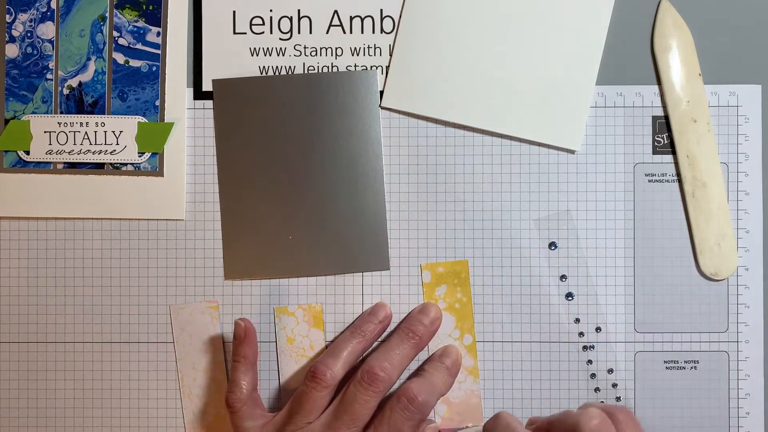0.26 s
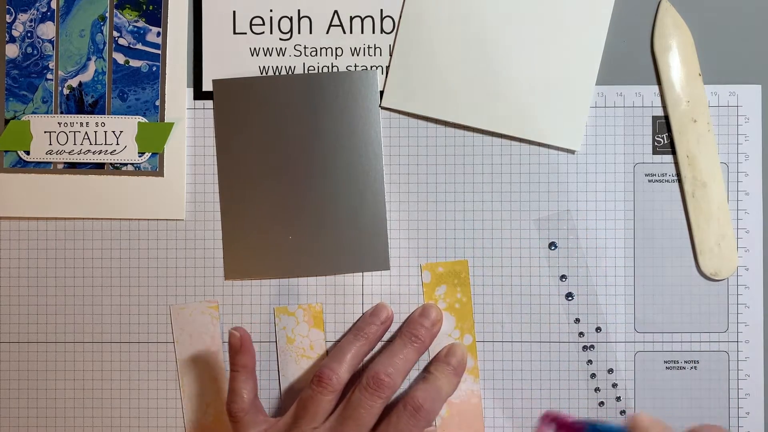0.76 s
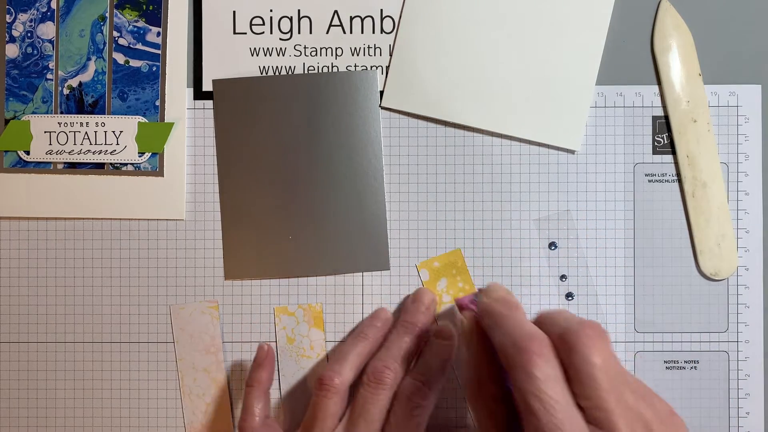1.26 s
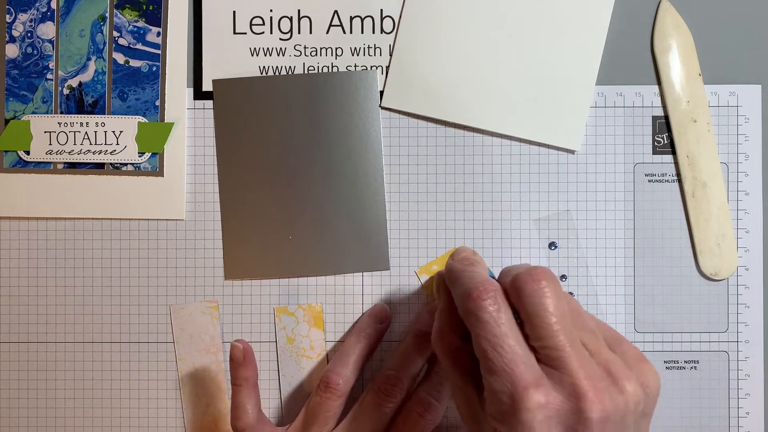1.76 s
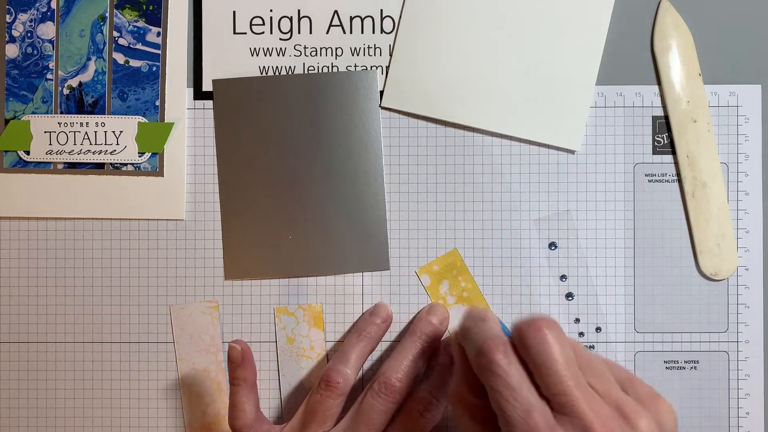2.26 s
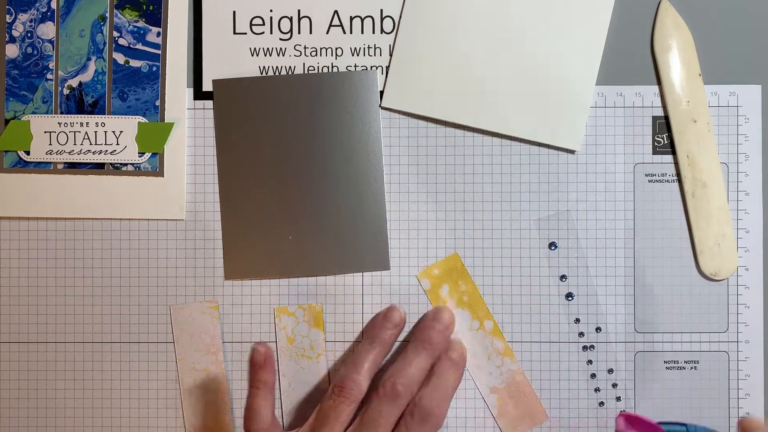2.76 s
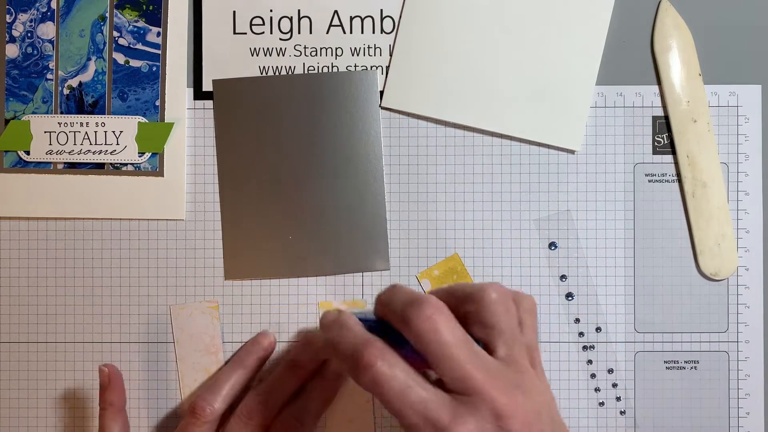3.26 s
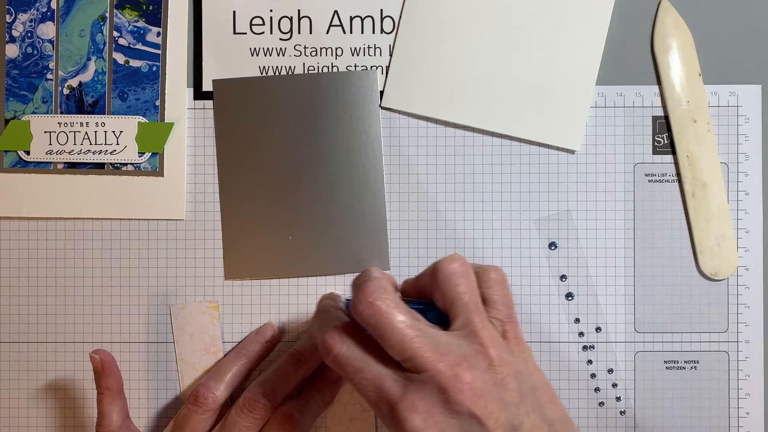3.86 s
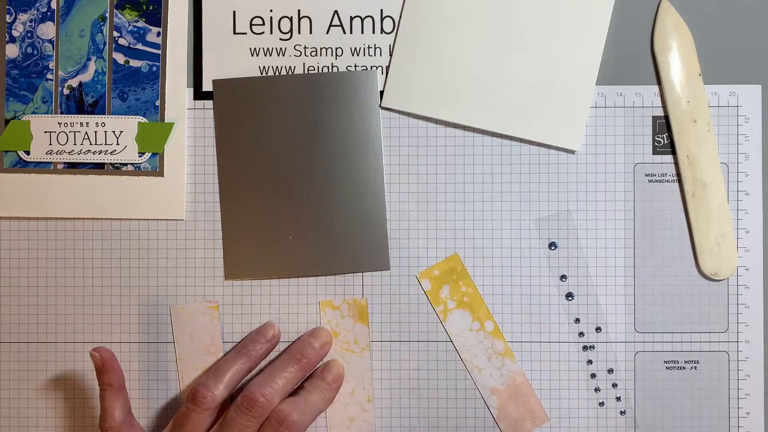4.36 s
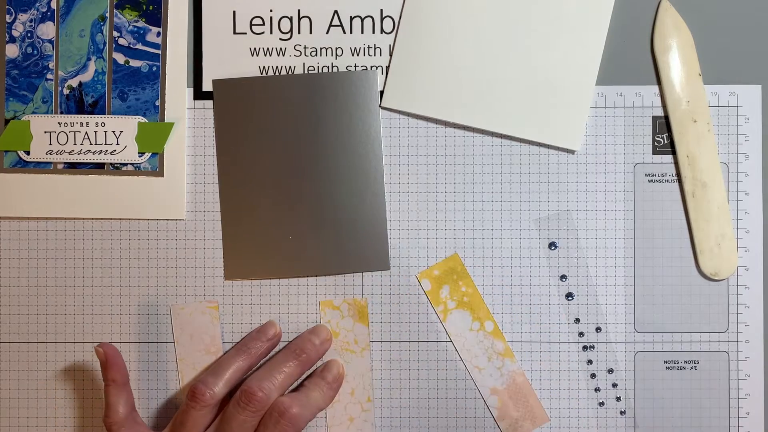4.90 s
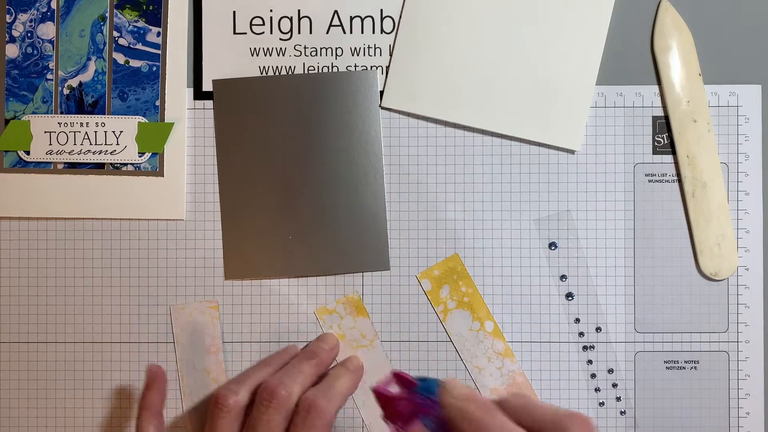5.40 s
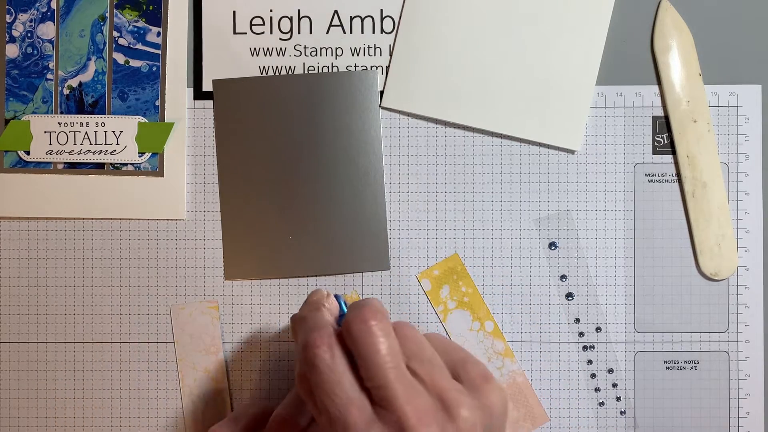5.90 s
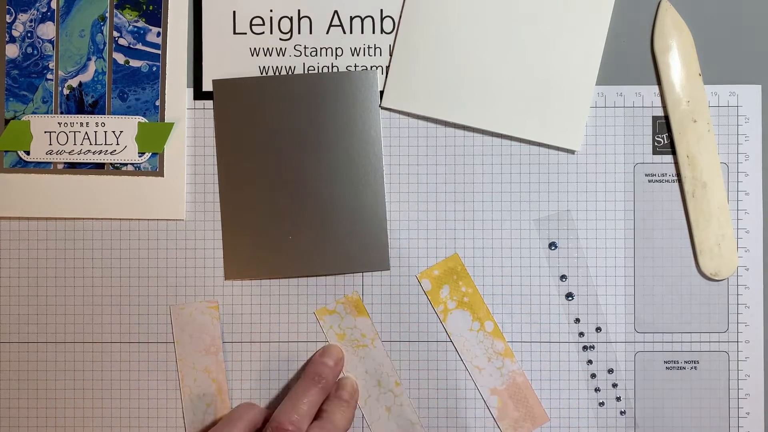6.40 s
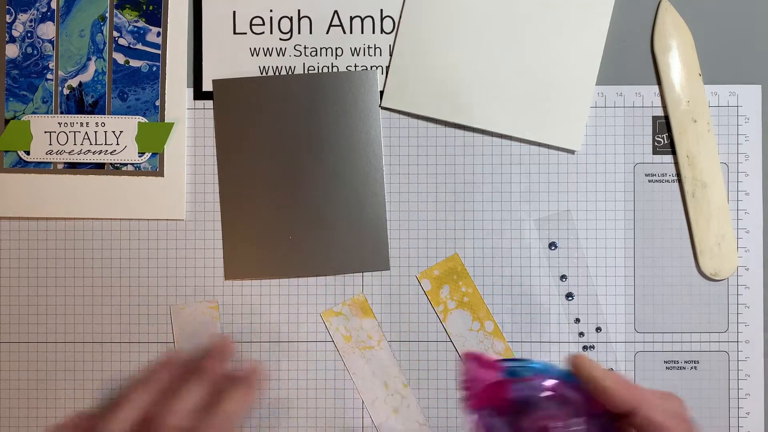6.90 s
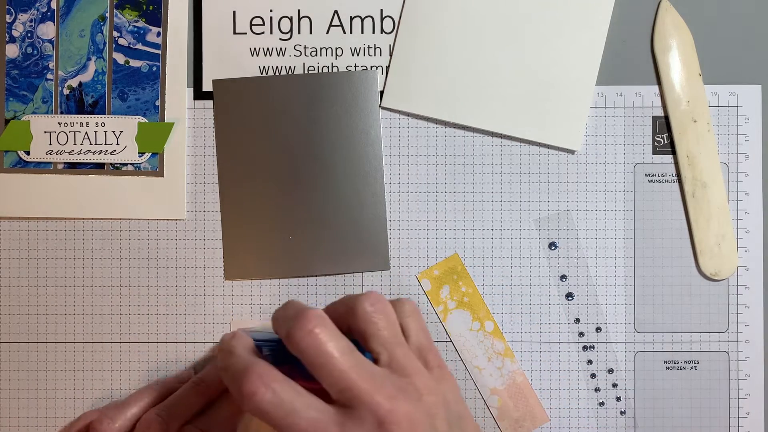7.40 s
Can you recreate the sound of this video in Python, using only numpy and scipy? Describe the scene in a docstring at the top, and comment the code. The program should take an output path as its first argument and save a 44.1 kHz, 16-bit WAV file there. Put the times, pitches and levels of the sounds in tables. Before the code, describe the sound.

Soft bumps and a glue snap lead into a very brief tape-runner rasp, then a longer, faster zip. After a loud snap come paper slides and plastic rattles, two tiny clicking strokes, a pause, another short rasp, then a chirp and a last long accelerating zip ending in the strongest snap. Gentle shuffling follows. Two close microphones at a table, small room, low hum.

```python
"""A small room hums and a hand brushes, knocks and leans at a table with a craft mat and paper strips.
Then a hand-held tape runner lays adhesive in six strokes: its ratchet ticks into the hollow plastic case,
the tape peels and the roller rumbles on the table. Glue snaps; between strokes the case knocks and paper slides.
One lift flicks the plastic tip, and the reel chirps just before the last stroke.
Shaped noise makes the rasps and rustles, fading sine waves the ringing case; two microphones stand close by."""
import sys
import numpy as np
from scipy import signal
from scipy.fft import rfft, irfft, next_fast_len
from scipy.io import wavfile

SR = 44100
rng = np.random.default_rng(int(sys.argv[2]) if len(sys.argv) > 2 else 0)


def wav_record(signal):
    """Record a signal, one row per channel, as 16-bit PCM in the file named by sys.argv[1]."""
    frames = np.transpose(np.atleast_2d(signal))
    bounded = np.clip(frames, -1, 1)
    # unit amplitude maps onto the largest positive 16-bit level
    quanta = np.round(bounded * 32767).astype(np.int16)
    wavfile.write(sys.argv[1], SR, quanta)


N = 337365
TIME = np.arange(N) / SR

# Event levels below are in dB before each sound's own level settings; spectra are relative.
# Low air noise of the room. Each row: frequency in Hz, level in dB per Hz.
AIR_SPECTRUM = [(20, -29), (40, -12), (55, 0.5), (82, 3), (100, -8.5), (120, -2.5), (150, -21),
                (220, -24.5), (300, -34.5), (700, -42), (1300, -48.5), (2500, -47.5), (7000, -47.5),
                (16000, -51.5)]
# Steady low tones in the room: hum near 59 and 118 Hz and a faint fan-like whine near 229 Hz.
# Each row: frequency in Hz, level in dB rms before it wavers.
ROOM_TONES = [(59.2, -62.5), (117.5, -63.5), (229, -84.5)]
# The hand brushing over paper and case. Each row: start in seconds, hold in seconds, level in dB,
# release in seconds.
BRUSH_MOVES = [(0.31, 0.047, -72.5, .02), (1.17, 0.088, -73, 0.015), (1.8, 0.011, -63, 0.016),
               (2.93, .07, -66, .06), (3.8, 0.031, -67.5, 0.0071), (4.8, 0.014, -65, 0.013),
               (5.19, 0.017, -71, .02), (5.33, .12, -70, .07), (5.795, .015, -65, 0.017),
               (5.99, .01, -61, 0.022), (6.81, 0.024, -66.5, 0.025), (7.03, 0.094, -74.5, 0.023),
               (7.154, 0.014, -69, 0.023), (7.35, 0.23, -78, .03)]
# Skin rubbing on the hollow case. Each row: frequency in Hz, level in dB per Hz.
RUB_SPECTRUM = [(200, -13), (600, -12.5), (1000, -5), (1550, -1), (2000, -10), (3000, -11), (6000, -22.5),
                (16000, -34)]
# The case knocking as it is gripped and set down. Each row: time in seconds, level in dB,
# level of the thud through the table in dB.
CASE_KNOCKS = [(0.307, -57, -47.5), (.359, -51, -46), (.501, -43, -63.5), (.783, -47.5, -50),
               (.839, -52.5, -50.5), (1.808, -57, -55.5), (2.082, -50, -49), (2.089, -39, -46),
               (2.123, -33, -52.5), (2.672, -41, -60.5), (2.834, -44, -63.5), (2.93, -49.5, -75.5),
               (2.996, -51, -69), (3.675, -55.5, -54), (3.881, -48.5, -73), (4.203, -47, -58),
               (4.765, -53, -49.5), (5.989, -40.5, -60), (6.083, -50, -63.5), (6.123, -50, -71.5),
               (6.617, -39.5, -62.5), (6.893, -51.5, -63), (6.964, -51, -65.5), (7.152, -46.5, -76),
               (7.175, -47, -64), (7.25, -59, -51.5)]
# Tones at which the plastic case rings. Each row: usual frequency in Hz, usual level in dB,
# time to fade by 60 dB in seconds.
CASE_MODES = [(1043, -12.5, 0.041), (1123, -8, .03), (1313, -2, 0.04), (1443, 0, 0.052),
              (1585, -3.5, 0.031), (1715, -3, .04), (1830, -8, 0.028), (2200, -12, .02), (2544, -10, 0.043),
              (3180, -13.5, 0.027)]
# The dull scuff of a knock. Each row: frequency in Hz, level in dB per Hz.
SCUFF_SPECTRUM = [(200, 3), (500, -17.5), (1100, 4.5), (2600, 1.5), (4500, -2.5), (7000, -8),
                  (16000, -23.5)]
# A dull blow through the table. Each row: frequency in Hz, level in dB per Hz.
THUD_SPECTRUM = [(50, -7.5), (110, 1), (160, -6), (212, 5), (290, -15), (390, -12.5), (550, -21.5),
                 (750, -15), (1200, -28), (3000, -45.5)]
# The hand landing or leaning on the table. Each row: start in seconds, peak level in dB.
HAND_THUMPS = [(0.368, -42.5), (0.573, -44), (2.095, -39.5), (2.551, -39), (3.693, -44.5), (4.785, -36.5),
               (6.008, -45)]
# Glue and paper letting go. Each row: time in seconds, level in dB,
# slap of the paper on the mat in dB relative to that, length of the pull before it in seconds.
GLUE_SNAPS = [(0.5362, -28, -16, .019), (0.7043, -20.5, -18, .011), (0.7203, -20, -19, 0.00033),
              (2.7073, -18.5, -18, 0), (2.9832, -35, -34, 0), (4.0778, -31, -34, 0),
              (4.2205, -22.5, -30, .012), (6.1546, -26, -30.5, 0.0004), (6.6602, -16, -14.5, .018),
              (6.9627, -45.5, -28, 0.00084)]
# Paper slapping the mat. Each row: frequency in Hz, level in dB per Hz.
SLAP_SPECTRUM = [(100, -29), (220, -11.5), (450, 1), (700, 2.5), (1200, 1.5), (2000, 3), (4000, -38),
                 (12000, -7.5)]
# Bright ticks, also used for glue cracks. Each row: frequency in Hz, level in dB per Hz.
TICK_SPECTRUM = [(300, -26), (900, -17.5), (2100, -10.5), (2600, -3.5), (3200, -3.5), (3900, -0.5),
                 (5500, -1), (7000, 1.5), (8000, -2), (8700, -1.5), (9500, 0), (11500, -2.5), (13000, 0),
                 (16000, -3)]
# The hand's push, one list per stroke from its first ratchet tooth. Each row: time in seconds,
# speed in teeth per second, pressure in dB, ring of the case in dB relative to the pressure.
PUSH_STROKES = [
    [(0.5499, 51.7, -19, -16), (0.58, 51.5, -17.5, -18), (0.62, 20.85, -18, -13)],
    [(2.1851, 23.5, -21.5, -13), (2.25, 60.2, -16, -11), (2.33, 63.2, -17, -13.5),
     (2.38, 91.4, -20.5, -18.5), (2.42, 81, -16.5, -19), (2.5, 99, -18, -16.5), (2.57, 40, -21, -19)],
    [(3.9165, 36, -20, -16), (3.945, 47, -16.5, -11), (3.99, 40, -18, -8)],
    [(4.0882, 39.6, -19, -5.5), (4.12, 39, -18, -2)],
    [(4.9077, 56.6, -22.5, -10.5), (4.925, 59.8, -22, -19), (4.941, 60, -16, -11), (4.985, 45, -19, -19),
     (5.035, 27, -20.5, -14)],
    [(6.1596, 40.5, -20, -12), (6.2, 61.1, -20.5, -18), (6.25, 52.4, -18.5, -21), (6.3, 74.6, -16.5, -27),
     (6.37, 105, -19.5, -14), (6.47, 116.1, -19, -8.5), (6.51, 30.1, -18.5, -17.5), (6.55, 10, -18, -19)],
]
# Adhesive peeling. Each row: frequency in Hz, level in dB per Hz.
PEEL_SPECTRUM = [(300, -27.5), (800, -14), (1300, 0.5), (1750, -10), (2100, -5), (2500, 1), (3000, -2.5),
                 (4000, 4), (5500, -5), (7000, 0), (11000, 0.5), (16000, -32.5)]
# The roller's rumble. Each row: frequency in Hz, level in dB per Hz.
ROLL_SPECTRUM = [(40, -10), (110, -4), (200, 4), (290, -20), (380, 1), (530, -28), (700, 3.5), (1000, -4),
                 (2000, -21)]
# Resonances of the taut tape and the paper under it. Each row: frequency in Hz, width in Hz, level in dB.
TAPE_RESONANCES = [(1250, 130, -5), (1870, 320, -1), (2600, 640, -.5), (3800, 660, 1.5)]
# Fingers and paper sliding over the mat. Each row: start in seconds, hold in seconds, hiss level in dB,
# release in seconds.
PAPER_SLIDES = [(0.946, 0, -56, 0.11), (1.282, 0, -69.5, .015), (1.47, 0.0067, -72, .015),
                (1.65, 0.015, -73.5, 0.033), (2.868, 0, -59.5, .006), (2.978, 0.0045, -60.5, 0.036),
                (3.128, 0.0063, -63.5, 0.016), (3.205, 0.11, -53.5, 0.019), (5.2, 0.0083, -62, 0.012),
                (5.316, 0.052, -57, .04), (5.41, 0.0084, -52.5, 0.07), (6.862, 0.0018, -54.5, .012),
                (7.098, 0, -57, .005), (7.15, 0.08, -47, 0.036)]
# The hiss of sliding. Each row: frequency in Hz, level in dB per Hz.
SLIDE_SPECTRUM = [(300, -11), (1000, -18), (2200, -12), (4000, -13), (6000, -2.5), (8500, -1), (11000, -1),
                  (16000, -2.5)]
# The flicked plastic tip. Each row: frequency in Hz, level in dB per Hz.
TIP_SPECTRUM = [(1000, -21.5), (2300, -16), (2800, -9), (3300, -4), (3750, 2.5), (4300, -10.5),
                (5200, -17.5), (16000, -19)]
# How the room's echo fades. Each row: frequency in Hz, time to fade by 60 dB in seconds.
ROOM_FADE = [(150, 0.25), (500, 0.2), (1500, 0.26), (4000, 0.19), (9000, 0.16), (16000, 0.092)]
# The two microphones. Each row: frequency in Hz, how far left leads right in radians.
LEFT_LEAD = [(0, 0), (1700, 0), (2300, 1.7), (3300, 1.4), (4800, 3.2), (9000, 9.4), (13200, 15.7),
             (15300, 18.8), (22050, 20)]

CUTOFF_HZ = 16200
USUAL_SPEED = 60  # teeth per second
# how unlike the teeth are: spread of the tick and of the ring
TICK_SPREAD_DB, RING_SPREAD_DB = 1.05, 3.0
# the pawl bounces once on each tooth, on average after this delay
BOUNCE_S, BOUNCE_DB = .0025, -7
# growth with each doubling of speed
PEEL_SPEED_DB, ROLL_SPEED_DB = 6, 11.5
# the peel starts almost at once, the rumble builds up; both die away after the stroke
PEEL_ATTACK_S, PEEL_RELEASE_S, ROLL_ATTACK_S, ROLL_RELEASE_S = .004, 0.01, .03, .018
# single strands of glue part during the pull: spacing, level relative to the last snap
STRAND_GAP_S, STRAND_DB = .007, -9
# each knock rebounds once, on average after this delay
REBOUND_S, REBOUND_DB = .022, -9


def from_db(db):
    """Turn decibels into a gain."""
    return 10 ** (np.asarray(db) / 20)


def rms_one(x):
    """Scale a sound to an rms (average strength) of one."""
    return x / np.sqrt(np.mean(x ** 2) + 1e-20)


def at_hz(points, hz):
    """Read a table between its rows, with frequency on a log scale."""
    f, value = np.transpose(points)
    return np.interp(np.log(np.maximum(hz, 1)), np.log(f), value)


def colour(x, spectrum):
    """Filter to a spectrum without sound before its cause (minimum phase); white noise keeps its power."""
    size = 2 * next_fast_len(N)
    gain = rms_one(from_db(at_hz(spectrum, np.fft.rfftfreq(size, 1 / SR))))
    # folding the cepstrum forward in time gives the minimum-phase filter
    cepstrum = irfft(np.log(gain))
    cepstrum[1:size // 2] *= 2
    cepstrum[size // 2 + 1:] = 0
    return irfft(rfft(x, size) * np.exp(rfft(cepstrum)))[..., :N]


def drift(rate):
    """Wander along straight lines between random knots of unit spread, `rate` knots a second."""
    knots = rng.standard_normal(N // 20)
    return np.interp(TIME * rate, np.arange(len(knots)), knots)


def pair_noise(length, apart_db):
    """White noise at two microphones: a shared part and a part of their own."""
    shared = rng.standard_normal(length)
    own = rng.standard_normal((2, length))
    return rms_one(shared + from_db(apart_db) * own)


def grains(per_s, spread_db):
    """Tiny random slips of uneven size, scaled to rms one."""
    sizes = from_db(spread_db * np.minimum(rng.exponential(1, N), 4))
    happens = rng.random(N) < per_s / SR
    return rms_one(happens * sizes * rng.choice([-1, 1], N))


def swells(rows, attack_s):
    """Gain of hand movements that each swell up to their start time, hold and die away."""
    total = 0
    for s, hold, db, release in rows:
        rising = (TIME - s) / attack_s
        falling = (s + hold - TIME) / release
        total = total + from_db(db) * np.exp(np.minimum(np.minimum(rising, falling), 0))
    return total


def bursts(times, levels_db, rise_s, decay_s, alike, apart_db):
    """A brief rasp at each contact; contacts of one part share some of their fine shape if alike > 0."""
    t = TIME[:SR // 15]
    shape = (1 - np.exp(-t / rise_s)) * np.exp(-t / decay_s)
    shape /= shape.max()
    strength = np.sqrt(np.mean(shape ** 2))
    shared = pair_noise(len(t), apart_db)
    out = np.zeros((2, N + len(t)))
    for s, db in zip(times, levels_db):
        fresh = pair_noise(len(t), apart_db)
        rasp = shape * (np.sqrt(alike) * shared + np.sqrt(1 - alike) * fresh)
        out[:, int(s * SR):][:, :len(t)] += from_db(db) * rms_one(rasp) * strength
    return out[:, :N]


def case(times, levels_db, scatter_db, detune, rise_s):
    """Each blow rings the case's tones with strengths of its own; the changing grip shifts them a little."""
    t = TIME[:SR // 12]
    hz, mode_db, t60 = np.transpose(CASE_MODES)[:, :, None]
    out = np.zeros(N + len(t))
    for s, db in zip(times, levels_db):
        strength, shift, phase = rng.standard_normal((3, len(CASE_MODES), 1))
        fading = from_db(mode_db + scatter_db * strength) * np.exp(-np.log(1000) * t / t60)
        tones = np.sin(2 * np.pi * (hz * (1 + detune * shift) * t + phase))
        sound = np.sum(fading * tones, axis=0) * (1 - np.exp(-t / rise_s))
        out[int(s * SR):][:len(t)] += from_db(db) * sound / np.abs(sound).max()
    return out[:N]


def background(air_db=-57.5, waver_db=-1.2):
    """Low room rumble, faint hiss and a wavering low hum with a faint fan-like whine."""
    air = colour(pair_noise(N, apart_db=-15.5), AIR_SPECTRUM)
    tones = 0
    for hz, db in ROOM_TONES:
        level = from_db(db + waver_db * drift(7.9))
        tones = tones + level * np.sin(2 * np.pi * hz * TIME + 0.2 * drift(3.3))
    return from_db(air_db) * air + np.sqrt(2) * tones  # root two turns rms into peak


def brushes(level_db=-3, uneven_db=-2.0, restless_db=-88, restless_spread_db=5.0):
    """Skin catching on paper and case gives a soft, uneven rustle; the hands are never quite still."""
    rustle = colour(grains(per_s=4000, spread_db=1.5), RUB_SPECTRUM) * from_db(uneven_db * drift(70))
    restless = from_db(restless_db + restless_spread_db * drift(10))
    moves = from_db(level_db) * swells(BRUSH_MOVES, attack_s=0.0079)
    return (moves + restless) * rustle


def knocks(case_db=-2, scuff_db=-13, thud_db=-7):
    """Soft contacts ring the case and rebound, with a dull scuff and a thud through the table."""
    rebounds = []
    for s, db, weight_db in CASE_KNOCKS:
        later = s + REBOUND_S * rng.uniform(.7, 1.3)
        rebounds.append((later, db + REBOUND_DB, weight_db + REBOUND_DB))
    s, db, weight_db = np.vstack([CASE_KNOCKS, rebounds]).T
    scuff = bursts(s, db + scuff_db, rise_s=0.0035, decay_s=0.0062, alike=0, apart_db=-10.5)
    thud = bursts(s, weight_db + thud_db, rise_s=0.0049, decay_s=0.0098, alike=0, apart_db=-5.5)
    ringing = case(s, db + case_db, scatter_db=4.0, detune=0.079, rise_s=0.0021)
    return ringing + colour(scuff, SCUFF_SPECTRUM) + colour(thud, THUD_SPECTRUM)


def table(table_hz=55, swell_s=0.023, level_db=0):
    """Pressure on the table top swells into its lowest tone and dies away."""
    out = np.zeros(N)
    for s, db in HAND_THUMPS:
        t = np.maximum(TIME - s, 0)
        swell = t / swell_s * np.exp(1 - t / swell_s)
        out += from_db(db + level_db) * swell * np.sin(2 * np.pi * table_hz * t)
    return out


def snaps(snap_db=-3, slap_db=-7, stretch_db=-26, stretch_lead_s=0.0081):
    """The glue stretches, parts strand by strand, lets go with a crack, and the paper drops back on the mat."""
    s, db, drop_db, _ = np.transpose(GLUE_SNAPS)
    strands = []
    for end, peak_db, _, pull_s in GLUE_SNAPS:
        for lead in np.arange(pull_s, 0, -STRAND_GAP_S):
            strands.append((end - lead, peak_db + STRAND_DB))
    crack_s, crack_db = np.transpose(strands + list(zip(s, db)))
    stretch = bursts(s - stretch_lead_s, db + stretch_db, rise_s=.005, decay_s=0.0048, alike=0, apart_db=-6.0)
    crack = bursts(crack_s, crack_db + snap_db, rise_s=0.00014, decay_s=0.00085, alike=0, apart_db=-6.0)
    slap = bursts(s, db + drop_db + slap_db, rise_s=0.00085, decay_s=0.0069, alike=0, apart_db=0)
    return colour(stretch + crack, TICK_SPECTRUM) + colour(slap, SLAP_SPECTRUM)


def teeth():
    """The pawl drops each time the reel has turned by one tooth: rows of (s, pressure dB, ring dB)."""
    rows = []
    for stroke in PUSH_STROKES:
        s, speed, pressure_db, ring_db = np.transpose(stroke)
        t = np.arange(s[0], s[-1], 1 / SR)
        turned = np.cumsum(np.interp(t, s, speed)) / SR  # in teeth
        drops = np.interp(np.arange(turned[-1]), turned, t)
        rows += zip(drops, np.interp(drops, s, pressure_db), np.interp(drops, s, ring_db))
    return np.array(rows)


def ratchet(tick_db=-2.5, case_db=-3.0, drag_db=-23, drag_lead_s=0.0048, thud_db=-30):
    """The pawl drags up each tooth and drops with a bright, bouncing tick that rings case and jolts table."""
    s, db, ring_db = teeth().T
    uneven = rng.standard_normal((len(s), 2))
    db = db + TICK_SPREAD_DB * uneven[:, 0]
    ring_db = ring_db + RING_SPREAD_DB * uneven[:, 1]
    drag = bursts(s - drag_lead_s, db + drag_db, rise_s=.004, decay_s=0.0035, alike=0, apart_db=-9.5)
    bounce = s + BOUNCE_S * rng.uniform(.5, 1.5, len(s))
    ticks = bursts(np.r_[s, bounce], np.r_[db, db + BOUNCE_DB] + tick_db,
                   rise_s=0.00046, decay_s=.0008, alike=0.24, apart_db=-5.0)
    thud = bursts(s, db + thud_db, rise_s=0.0011, decay_s=0.0057, alike=0, apart_db=-2)
    ringing = case(s, db + ring_db + case_db, scatter_db=5.0, detune=0.05, rise_s=0.00096)
    return colour(ticks + drag, TICK_SPECTRUM) + ringing + colour(thud, THUD_SPECTRUM)


def effort(speed_db, attack_s, release_s):
    """Gain that follows the pressure and speed of each stroke, with an attack and a release."""
    out = np.zeros(N)
    for stroke in PUSH_STROKES:
        s, speed, pressure_db, _ = np.transpose(stroke)
        doublings = np.log2(np.interp(TIME, s, speed) / USUAL_SPEED)
        db = np.interp(TIME, s, pressure_db) + speed_db * doublings
        attack = 1 - np.exp(-np.maximum(TIME - s[0], 0) / attack_s)
        release = np.exp(-np.maximum(TIME - s[-1], 0) / release_s)
        out += from_db(db) * attack * release
    return out


def resonate(x, hz, width_hz):
    """Let through a narrow band around one frequency, as a resonance does."""
    return signal.lfilter(*signal.iirpeak(hz, hz / width_hz, fs=SR), x)


def tape(peel_db=-22.5, roll_db=-42, flutter_db=2.5, shifting_db=6.0, modes_db=-3,
         boom_db=1, boom_hz=58, boom_width_hz=35):
    """Adhesive crackles off its carrier through changing resonances; the roller rumbles and booms the table."""
    crackle = grains(per_s=3500, spread_db=2.0) * from_db(flutter_db * drift(200))
    peel = colour(crackle, PEEL_SPECTRUM)
    for hz, width, db in TAPE_RESONANCES:
        peel = peel + resonate(crackle, hz, width) * from_db(db + modes_db + shifting_db * drift(25))
    boom = rms_one(resonate(rng.standard_normal(N), boom_hz, boom_width_hz))
    roll = colour(pair_noise(N, apart_db=4.0), ROLL_SPECTRUM) + from_db(boom_db) * boom
    peel_gain = from_db(peel_db) * effort(PEEL_SPEED_DB, PEEL_ATTACK_S, PEEL_RELEASE_S)
    roll_gain = from_db(roll_db) * effort(ROLL_SPEED_DB, ROLL_ATTACK_S, ROLL_RELEASE_S)
    return peel_gain * peel + roll_gain * roll


def slides(level_db=0):
    """Skin and paper gliding on the mat give a fine, high hiss."""
    hiss = colour(grains(per_s=17000, spread_db=5.5), SLIDE_SPECTRUM) * from_db(0.53 * drift(71))
    return from_db(level_db) * swells(PAPER_SLIDES, attack_s=0.013) * hiss


def tip(start_s=2.7066, decay_s=0.002, level_db=-22):
    """One lift flicks the runner's plastic tip: a very short burst of noise in the tip's own colour."""
    flick = bursts([start_s], [level_db], rise_s=0.00021, decay_s=decay_s, alike=0, apart_db=-6.0)
    return colour(flick, TIP_SPECTRUM)


def squeak(start_s=6.153, squeak_hz=3900, length_s=0.021, level_db=-33):
    """The reel chirps as it starts to turn: a short, unsteady high tone."""
    swell = np.sin(np.pi * np.clip((TIME - start_s) / length_s, 0, 1))
    return from_db(level_db) * swell * np.sin(2 * np.pi * squeak_hz * TIME + 0.86 * drift(430))


def room(x, near_db=-6.0, near_s=.011, far_db=-10.0):
    """Quick reflections from desk and hands, then the room's tail; mostly different at the two microphones."""
    t = TIME[:SR // 2]
    white, early = pair_noise(len(t), apart_db=2), pair_noise(len(t), apart_db=9)
    freqs, edges = np.fft.rfftfreq(len(t), 1 / SR), np.geomspace(120, SR / 2, 12)
    far = 0
    # each band of the tail fades at its own pace
    for low, high in zip(edges, edges[1:]):
        band = irfft(rfft(white) * ((freqs >= low) & (freqs < high)), len(t))
        far = far + band * np.exp(-np.log(1000) * t / at_hz(ROOM_FADE, np.sqrt(low * high)))
    far = far * np.clip(t / 0.0048, 0, 1)
    near = early * np.exp(-t / near_s) * (t > .0005)
    response = (from_db(near_db) * rms_one(near) + from_db(far_db) * rms_one(far)) / np.sqrt(len(t))
    return x + signal.fftconvolve(x, response, axes=1)[:, :N]


def scene():
    """The work at the table, heard in the room."""
    handling = brushes() + knocks() + slides()
    runner = snaps() + ratchet() + tape() + tip() + squeak()
    return background() + table() + room(handling + runner)


def record(dry):
    """The treble reaches the left microphone before the right; the top is cut."""
    size = next_fast_len(N + SR // 10)
    lead = np.interp(np.fft.rfftfreq(size, 1 / SR), *np.transpose(LEFT_LEAD))
    # half the lead moves left forward, the other half moves right back
    turn = np.exp(.5j * lead * np.array([[1], [-1]]))
    pair = irfft(rfft(dry, size) * turn, size)[:, :N]
    top_cut = signal.ellip(10, .05, 60, CUTOFF_HZ, fs=SR, output="sos")
    return signal.sosfiltfilt(top_cut, pair)


dry = scene()
out = record(dry)
wav_record(out)
```